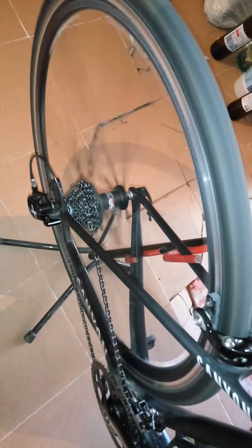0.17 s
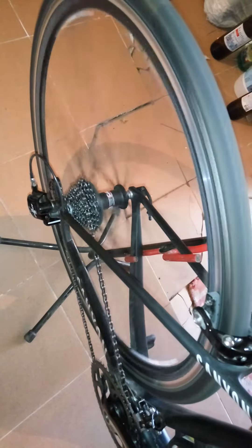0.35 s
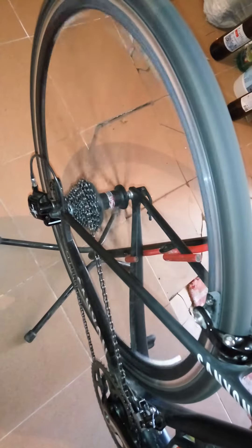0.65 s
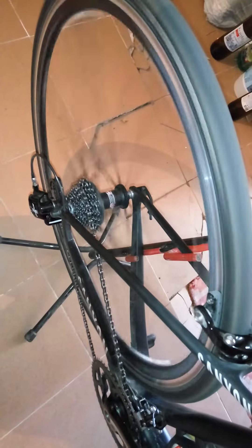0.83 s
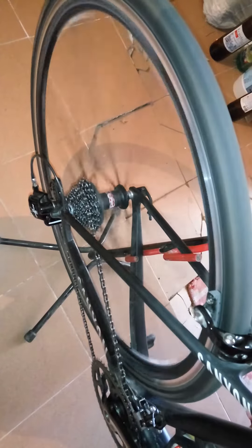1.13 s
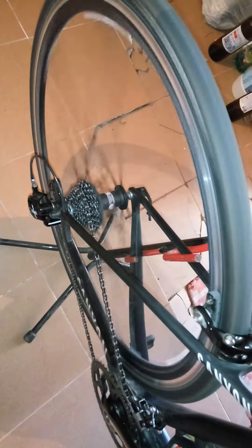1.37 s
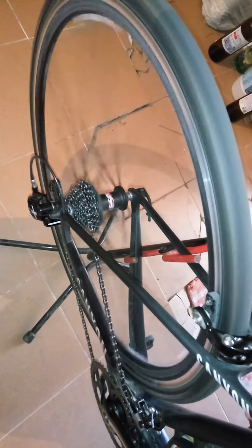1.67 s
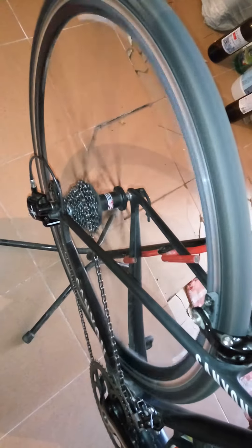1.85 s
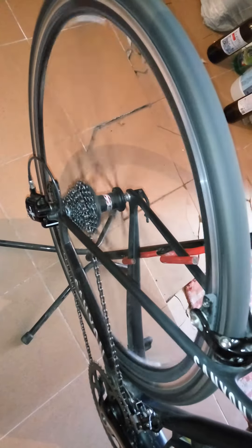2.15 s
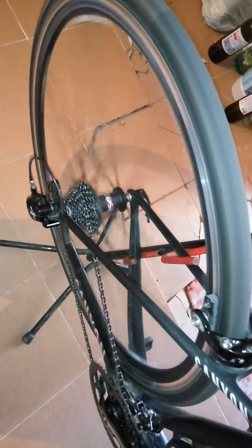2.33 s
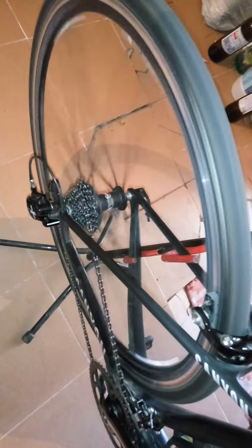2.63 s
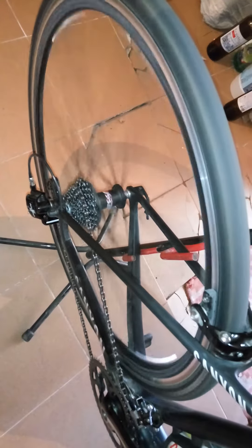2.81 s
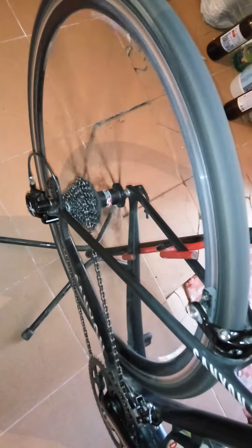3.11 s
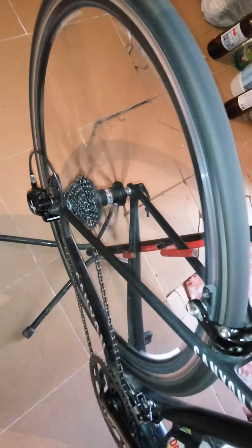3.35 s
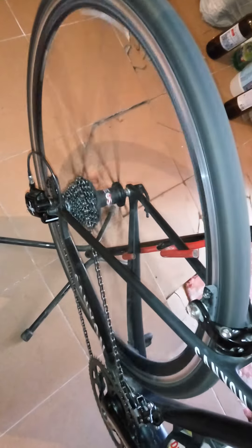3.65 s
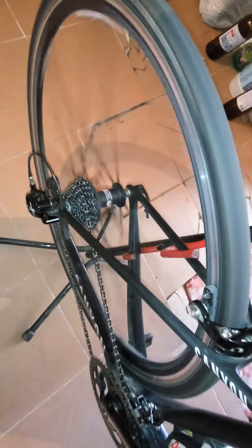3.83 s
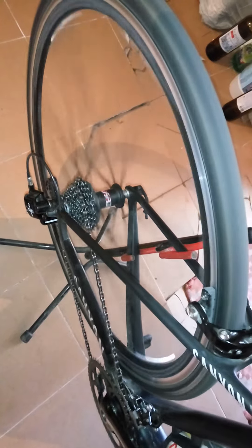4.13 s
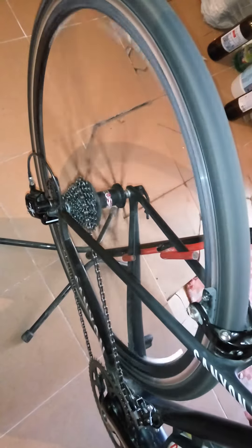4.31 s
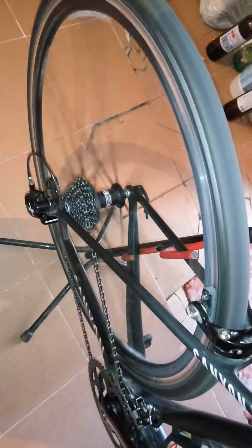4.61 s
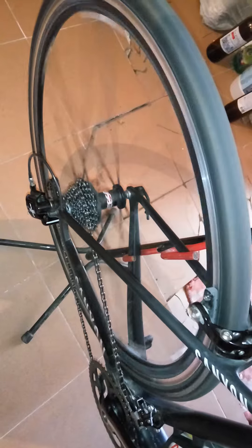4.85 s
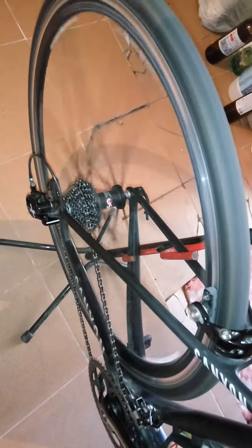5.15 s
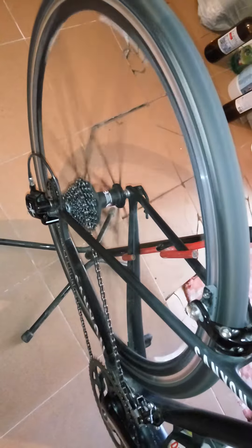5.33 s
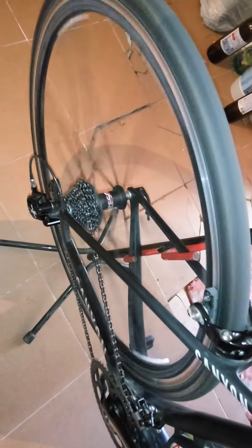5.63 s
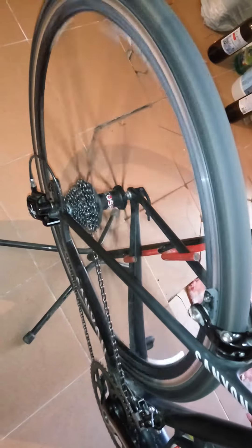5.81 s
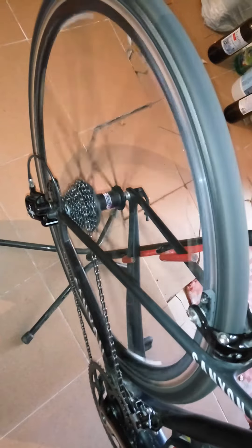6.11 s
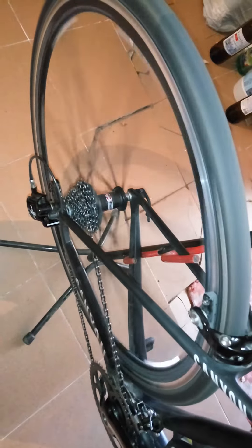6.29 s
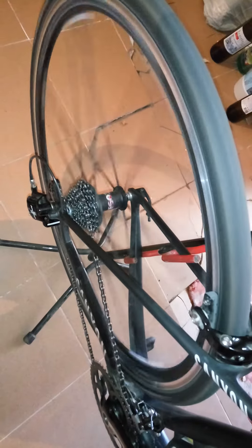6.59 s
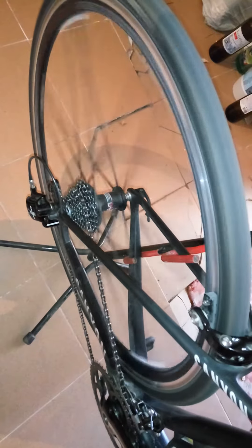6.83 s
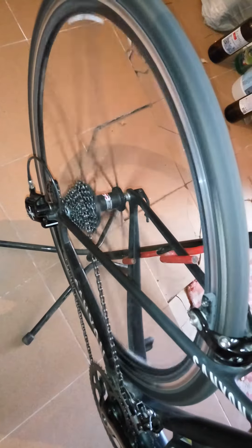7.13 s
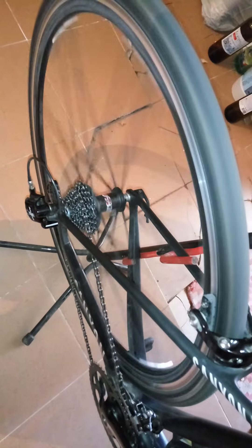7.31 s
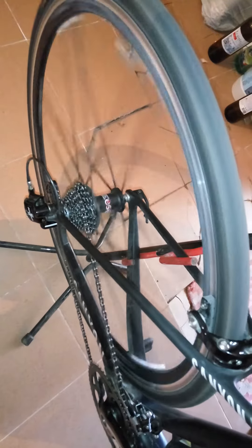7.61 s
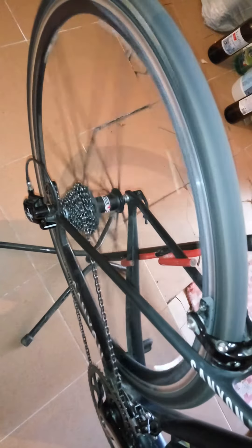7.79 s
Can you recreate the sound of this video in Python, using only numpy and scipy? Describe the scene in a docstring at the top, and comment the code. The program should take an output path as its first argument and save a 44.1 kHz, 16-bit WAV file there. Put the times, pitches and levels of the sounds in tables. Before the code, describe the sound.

A coasting bicycle rear wheel ticks rapidly and metallically, gradually slowing, while two sharp knocks and a scuff hit the microphone near three seconds.

```python
"""Coasting bicycle freehub

A bicycle's rear wheel coasts on a stand in a tiled room. Freehub pawls drop over the ratchet teeth, ever slower:
filtered noise bursts make the clicks, decaying modes ring hub, sprockets and spokes, and decaying noise is the room.
An appliance hums faintly in sine tones, with a low wavering drone, over shaped noise for air and rumble.
From 2.3 to 3.3 s a finger brushes and knocks the left microphone port: filtered impulses, casing rings and noise."""
import sys
import numpy as np
from scipy import signal
from scipy.fft import rfft, irfft, next_fast_len
from scipy.io import wavfile
from scipy.ndimage import uniform_filter1d, map_coordinates

SR = 44100
rng = np.random.default_rng(int(sys.argv[2]) if len(sys.argv) > 2 else 0)


def materialize(psi):
    """Save the field psi as 16-bit PCM at rate SR to the path in sys.argv[1].

    A 1-D psi becomes a single channel; in a 2-D psi each row is a channel.
    """
    bounded = np.clip(np.atleast_2d(psi).T, -1, 1)
    quanta = np.round(bounded * 32767).astype(np.int16)
    wavfile.write(sys.argv[1], SR, quanta)


N = 351036


def amp(db):
    """Level: decibels to an amplitude gain."""
    return 10 ** (np.asarray(db) / 20)


def unit(x):
    """Normalisation: scale to rms 1."""
    return x / np.sqrt(np.mean(x ** 2) + 1e-20)


def along(points, hz):
    """Interpolation of (frequency, value) points on a logarithmic frequency axis."""
    f, v = np.transpose(points)
    return np.interp(np.log(hz + 1), np.log(f + 1), v)


def curve(rows):
    """Interpolation of (time, value) rows to one value per sample."""
    return np.interp(np.arange(N) / SR, *np.transpose(rows))


def wobble(rate):
    """Random modulation: a smooth curve through normal random knots, rate knots per second."""
    knots = rng.standard_normal(int(N * rate / SR) + 4)
    return map_coordinates(knots, [np.arange(N) * rate / SR])


def filtered(x, response):
    """Linear filtering: multiply the spectrum of x by a frequency response."""
    size = x.shape[-1]
    m = next_fast_len(size + 8192)
    return irfft(rfft(x, m) * response(np.fft.rfftfreq(m, 1 / SR)), m)[..., :size]


def coloured(x, spectrum):
    """Spectral shaping: x takes on a spectrum, at rms 1."""
    return unit(filtered(x, lambda hz: amp(along(spectrum, hz))))


def cut(x, hz, kind, order):
    """Causal Butterworth high-pass or low-pass."""
    return signal.sosfilt(signal.butter(order, min(hz, SR / 2 - 1), kind, fs=SR, output="sos"), x)


def panned(db):
    """Interaural level difference: left and right gains for left minus right in dB."""
    return amp(np.array([[.5], [-.5]]) * db)


def add(track, s, sound):
    """Superposition: mix a sound into the track at time s."""
    start = max(round(s * SR), 0)
    part = track[..., start:start + sound.shape[-1]]
    part += sound[..., :part.shape[-1]]


# likeness of the left and right noise: (frequency [Hz], correlation [0 to 1])
PORT_LIKENESS = [(60, 0.45), (200, 0.55), (640, 0.68), (1400, 0.1498)]


def room_noise(spectrum):
    """Spatial coherence: stereo noise of rms 1 from mid and side parts weighted by left-right likeness."""
    def angle(hz):
        return np.arccos(np.clip(along(PORT_LIKENESS, hz), -1, 1)) / 2

    def mid_side_gains(hz):
        return np.array([np.cos(angle(hz)), np.sin(angle(hz))])

    mid, side = filtered(rng.standard_normal((2, N)), mid_side_gains)
    return coloured(np.array([mid + side, mid - side]), spectrum)


# spectrum of the still air: (frequency [Hz], relative density [dB per Hz])
AIR_SPECTRUM = [(20, -14), (60, -13), (130, -8.5), (220, 0.5), (400, -8.5), (800, -10.5), (2000, -17.5),
                (6000, -22), (15000, -30)]
# soft low rumble, strongest while the microphone is handled: (time [s], relative level [dB])
RUMBLE_LEVEL = [(0.0, -77), (2.1, -80.5), (2.76, -63), (3.6, -78.5), (4.08, -73.5), (5.04, -81.5),
                (6.09, -74.5), (6.45, -81.5), (7.2, -74.5), (7.95, -81)]
# spectrum of that rumble: (frequency [Hz], relative density [dB per Hz])
RUMBLE_SPECTRUM = [(20, -25), (38, -19), (54, -5.5), (71, -0.5), (88, -5.5), (110, -4), (150, -3),
                   (230, -28), (600, -69.5)]


def room_air(air_db=-77, rumble_db=-4, wander_db=.5):
    """Broadband background noise: faint steady air noise over a slowly wandering rumble."""
    air = amp(air_db) * room_noise(AIR_SPECTRUM)
    rumble_gain = amp(curve(RUMBLE_LEVEL) + rumble_db + wander_db * wobble(3))
    return air + rumble_gain * room_noise(RUMBLE_SPECTRUM)


# steady tones of the appliance: (frequency [Hz], relative level [dB])
HUM_TONES = [(242.2, -84), (344.5, -92.5), (393.0, -81.5), (538.3, -89)]
# mean level of the wavering low tone: (time [s], peak amplitude [dB])
DRONE_LEVEL = [(0.0, -66), (0.27, -76.5), (0.44, -65), (0.54, -74.5), (1.2, -75), (1.29, -63.5),
               (1.42, -64.5), (1.55, -78), (1.91, -66.5), (2.1, -74.5), (2.32, -71), (3.25, -75.5),
               (3.6, -67), (3.72, -74.5), (4.13, -66.5), (4.24, -75), (4.6, -76.5), (4.88, -70),
               (5.14, -68.5), (5.3, -75), (5.9, -74.5), (6.06, -69.5), (6.62, -74), (6.81, -62),
               (7.12, -79), (7.22, -57), (7.3, -78), (7.95, -73)]
DRONE_FLUTTER_DB, DRONE_FLUTTER_RATE = 2, 15  # quick random swells (dB, knots per s)


def hum(drone_hz=197.0, drone_db=0, waver_rad=0.9, tones_db=3, drift_rad=.25):
    """Tonal noise with random phase modulation: a wavering drone and the steady tones of an appliance."""
    t = np.arange(N) / SR
    drone_gain = amp(curve(DRONE_LEVEL) + drone_db + DRONE_FLUTTER_DB * wobble(DRONE_FLUTTER_RATE))
    out = drone_gain * np.sin(2 * np.pi * drone_hz * t + waver_rad * wobble(14))
    for hz, db in HUM_TONES:
        out += amp(db + tones_db) * np.sin(2 * np.pi * hz * t + drift_rad * wobble(3))
    return out


# finger contacts, before the port's filters: (time [s], peak of the push [dB], sharpness [Hz],
# low cut [Hz], scuff relative to the push [dB], casing snap relative to the push [dB])
FINGER_TAPS = [(2.271, -39, 197, 116, -27, -44), (2.69, -47.5, 600, 120, -25, -25),
               (2.708, -45.5, 200, 110, -30, -30), (2.719, -49, 1200, 150, -20, 4),
               (2.767, -42, 700, 150, -16, -14), (2.7865, -28.5, 675, 160, -43, 10.5),
               (2.8212, -36.5, 199, 127.4, -18, -26), (2.88, -41, 107, 89, -26.5, -33),
               (2.964, -23, 3000, 300, -16, -6.5), (2.968, 6.5, 940, 229, -30.5, -7.5),
               (2.972, -8.5, 1100, 170, -26.5, -22.5), (3.1799, -2, 1340, 224.4, -29, -23.5)]
# the casing's short ring: (frequency [Hz], relative level [dB], t60 [s])
CASING_MODES = [(5580, -2.5, 0.0039), (11800, -14.5, 0.003)]
# the fingertip brushing, then sliding over the port, before its filters: (time [s], level [dB])
SLIDE_LEVEL = [(2.68, -79), (2.79, -60), (2.931, -77), (2.955, -45.5), (2.98, -32.5), (3.045, -48.5),
               (3.09, -42), (3.149, -42), (3.168, -55.5), (3.19, -39.5), (3.251, -40.5), (3.29, -71)]
# spectrum of skin friction: (frequency [Hz], relative density [dB per Hz])
SKIN_SPECTRUM = [(24, -48.5), (40, -19.5), (197, -5), (354, -2), (410, -2), (1470, -8), (2460, -14),
                 (2710, -16), (3820, -19.5), (6100, -18), (8000, -33.5), (14000, -56.5)]


def finger(scuff_t60=0.069, damping=1.0, stick_db=3, crack=0.02, casing_rise_s=.00008,
           port_low_hz=68, port_top_hz=8400, leak_db=-58):
    """Impulsive excitation and friction: contacts push air in the left port and snap the casing; skin scuffs."""
    t = np.arange(SR // 10) / SR
    left, snaps = np.zeros(N), np.zeros(N)
    casing = sum(np.sin(2 * np.pi * hz * t) * amp(db - 60 * t / t60) for hz, db, t60 in CASING_MODES)
    casing = casing * (1 - np.exp(-t / casing_rise_s))
    impulse = 1.0 * (t == 0)
    for s, db, sharp_hz, cut_hz, scuff_db, snap_db in FINGER_TAPS:
        def push_response(f):
            # the pressure leaks away and swings back
            vent = (1j * f) ** 2 / (cut_hz ** 2 + 1j * f * damping * cut_hz - f ** 2)
            soft = 1 / (1 + 1j * f / sharp_hz)
            return vent * (soft ** 2 + crack * soft)

        push = filtered(impulse, push_response)
        scuff = coloured(rng.standard_normal(len(t)), SKIN_SPECTRUM) * amp(scuff_db - 60 * t / scuff_t60)
        add(left, s, amp(db) * (scuff - push / np.abs(push).max()))
        add(snaps, s, amp(db + snap_db) * casing)
    # no friction outside the slide's first and last times
    slide_db = np.interp(np.arange(N) / SR, *np.transpose(SLIDE_LEVEL), left=-np.inf, right=-np.inf)
    stick_slip = rng.standard_normal(N) * amp(stick_db * wobble(300))
    left += amp(slide_db) * coloured(stick_slip, SKIN_SPECTRUM)
    # the covered port is muffled; the casing's snaps bypass it
    left = cut(left, port_low_hz, "highpass", order=2)
    left = snaps + cut(left, port_top_hz, "lowpass", order=4)
    return np.array([left, amp(leak_db) * left])


# decay of the tiled room: (frequency [Hz], t60 [s])
ROOM_DECAY = [(300, .45), (2000, 0.69), (6000, 0.5), (13000, .2)]
# colour of the room's answer: (frequency [Hz], gain [dB])
ROOM_COLOUR = [(500, 2.5), (2000, 0.5), (5000, -2), (9000, -3.5), (14000, -2.5)]


def room(x, delay_s=0.0084):
    """Reverberation: convolution with decaying noise, its tail shortest in the high treble."""
    hz, t, z = signal.stft(rng.standard_normal((2, SR // 2)), SR, nperseg=256)
    decay = amp(-60 * t / along(ROOM_DECAY, hz)[:, None])
    tail = signal.istft(z * decay, SR, nperseg=256)[1]
    wet = signal.fftconvolve(x, tail / np.linalg.norm(tail[0]), axes=1)[:, :N]
    return filtered(wet, lambda f: amp(along(ROOM_COLOUR, f)) * np.exp(-2j * np.pi * f * delay_s))


# the coasting wheel slows: (time [s], rate [ratchet teeth per s])
WHEEL_SPEED = [(0.0, 29.026), (1.2, 26.875), (3.0, 23.665), (5.7, 19.023), (6.9, 17.1), (7.96, 15.152)]
# how hard the pawls snap on average: (time [s], relative level [dB])
SNAP_LEVEL = [(0.0, -51.5), (2.2, -51.5), (3.3, -51.5), (5.0, -52.5), (7.3, -52.5), (7.9, -55.5)]
TEETH, PAWLS = 30, 3  # teeth on the ratchet ring, pawls that share them
START_TOOTH = 0.47  # where the ring stands at time 0 (teeth)
IMBALANCE = 0.025  # the heavy side of the rim makes the wheel lag and lead once a turn (teeth)
# the ring sits off centre, so the snaps swell each time its tight spot passes a pawl
TIGHT_TOOTH, SWELL_DB, SNAP_SCATTER_DB = 6.42, 1.4, 1.08  # (tooth number, dB either way, dB rms per tooth)


def pawl_drops(scatter_s=.0004):
    """Ratchet kinematics: one drop per passing tooth, swelling once per pawl in every turn: (s, strength)."""
    passed = START_TOOTH + np.cumsum(curve(WHEEL_SPEED)) / SR
    tooth = np.arange(1, int(passed[-1]) + 1)
    turns = tooth / TEETH
    late, hard = rng.standard_normal((len(tooth), 2)).T
    uneven_tooth = tooth + IMBALANCE * np.cos(2 * np.pi * turns)
    times = np.interp(uneven_tooth, passed, np.arange(N) / SR) + scatter_s * late
    swell_db = SWELL_DB * np.cos(2 * np.pi * PAWLS * (turns - TIGHT_TOOTH / TEETH))
    snap_db = np.interp(times, *np.transpose(SNAP_LEVEL))
    return np.transpose([times, amp(snap_db + swell_db + SNAP_SCATTER_DB * hard)])


# spectrum of the click: (frequency [Hz], relative density [dB per Hz])
CLICK_SPECTRUM = [(300, -16), (650, -8), (950, -16.5), (1400, -9), (1900, -1.5), (2500, -0.5), (3600, -3),
                  (4600, 0.5), (5900, 1.5), (7000, -5.5), (8200, -14.5), (9700, -10.5), (12400, -15.5),
                  (13600, -24), (15000, -25.5)]
# stereo place of the click: (frequency [Hz], left minus right [dB])
CLICK_BALANCE = [(1000, -1), (1900, -3), (2800, -1.5), (3800, 7.5), (5000, 3.5), (6400, -5.5), (8200, -6),
                 (14000, -2)]


def pawl_clicks(drops, rise_s=0.00099, snap_t60=0.043, rattle_t60=0.09, rattle_db=-9, grit_db=1.0,
                same=0.52, colour_db=3.0):
    """Impact noise: each drop is a short clatter in the hub shell, partly alike from tooth to tooth."""
    t = np.arange(SR // 12) / SR
    decay = np.hypot(amp(-60 * t / snap_t60), amp(rattle_db - 60 * t / rattle_t60))
    envelope = (1 - np.exp(-t / rise_s)) * decay
    envelope_rms = np.sqrt(np.mean(envelope ** 2))
    shell = rng.standard_normal((2, len(t)))
    out = np.zeros((2, N))
    for s, strength in drops:
        bounces = amp(grit_db * unit(uniform_filter1d(rng.standard_normal(len(t)), size=30)))
        fresh = rng.standard_normal(shell.shape)
        clatter = rfft(np.sqrt(same) * shell + np.sqrt(1 - same) * fresh)
        # each tooth has its own colour
        tint = amp(colour_db * unit(uniform_filter1d(rng.standard_normal(clatter.shape), size=50)))
        click = unit(envelope * bounces * irfft(clatter * tint, len(t)))
        add(out, s, strength * envelope_rms * click)
    return filtered(out, lambda hz: amp(along(CLICK_SPECTRUM, hz)) * panned(along(CLICK_BALANCE, hz)))


# hub, sprocket and spoke modes: (centre of the pair [Hz], relative level [dB], t60 [s], left minus right [dB])
STEEL_MODES = [(1077, -12, 0.18, 1.5), (1207, -19.5, 0.42, 0.5), (1450, -15, .25, 1.5),
               (1690, -14, 0.23, -2), (1758, -14, 0.37, -7.5), (2308, -7.5, .16, -8), (2633, 0, .18, 4),
               (3000, -9, 0.28, 0), (3498, -13, 0.14, 6.5), (3500, -12.5, 0.21, 2.5), (4235, -1, 0.18, 7),
               (4345, -7, .13, 3.5), (4845, -3, 0.1401, -1), (4720, -4, 0.12, 0.5), (5390, -4.5, 0.097, 0),
               (5440, -8.5, 0.055, -6), (6340, -13.5, 0.096, -9.5), (6540, -15.5, .1, -9.5)]


def wheel_ring(drops, vary_db=3.0, spread=0.0072, rise_s=.002, swing_db=4.0, wander=.005, eager=0.22):
    """Modal synthesis: steel rings in close, beating pairs of decaying modes, most after hard snaps."""
    t = np.arange(SR // 5) / SR
    out = np.zeros((2, N))
    times, strengths = drops.T
    strengths = strengths * (strengths / strengths.mean()) ** eager
    for hz, db, t60, pan_db in STEEL_MODES:
        # modes flare and fade at random over a few teeth, as the wheel turns past the microphone
        drift = unit(uniform_filter1d(rng.standard_normal(len(drops)), size=3))
        swing = swing_db * np.tanh(drift) * np.sqrt(2)
        pair = hz * (1 + spread * np.array([[-1], [1]]))
        ring = np.exp(2j * np.pi * pair * t) * amp(db - 60 * t / t60) * (1 - np.exp(-t / rise_s))
        # the pitch shifts a little from tooth to tooth
        shifts = wander * np.array([[-1], [-.5], [.5], [1]])
        detunes = np.exp(2j * np.pi * hz * shifts * t)
        for s, strength, flare_db in zip(times, strengths, swing):
            phase = np.exp(2j * np.pi * rng.random((2, 2)))
            blow = strength * amp(flare_db + vary_db * rng.standard_normal((2, 2))) * phase
            modes = (panned(pan_db) * blow) @ ring
            add(out, s, (modes * detunes[rng.integers(len(detunes))]).real)
    return out


def freehub(click_db=8, ring_db=-14.0, room_db=-6):
    """Excitation, resonance and reverberation: pawl clicks, the steel's ring, and the room answering the clicks."""
    drops = pawl_drops()
    clicks = amp(click_db) * pawl_clicks(drops)
    return clicks + amp(ring_db) * wheel_ring(drops) + amp(room_db) * room(clicks)


def scene():
    """Superposition: the room, the finger on the microphone and the wheel."""
    return room_air() + hum() + finger() + freehub()


TOP_HZ = 15700


def record(dry):
    """Saturation and band limiting: clip at full scale, then keep only what lies below TOP_HZ."""
    return filtered(np.clip(dry, -1, 1), lambda hz: hz < TOP_HZ)


dry = scene()
out = record(dry)
materialize(out)
```